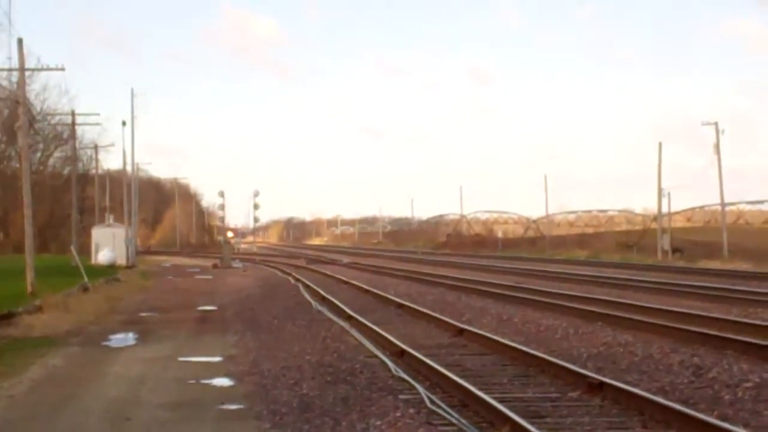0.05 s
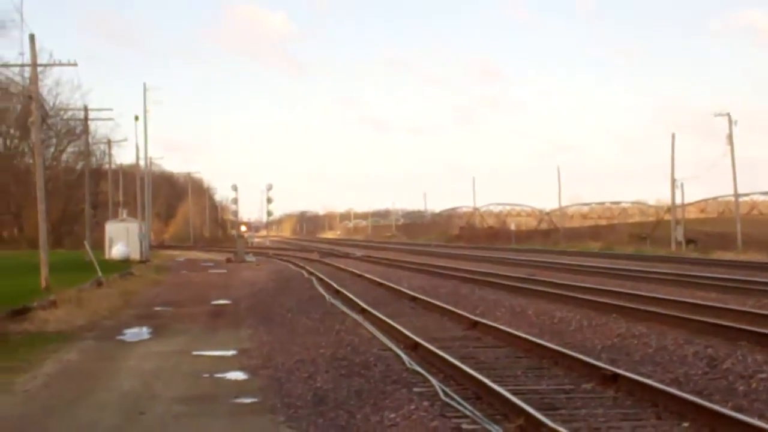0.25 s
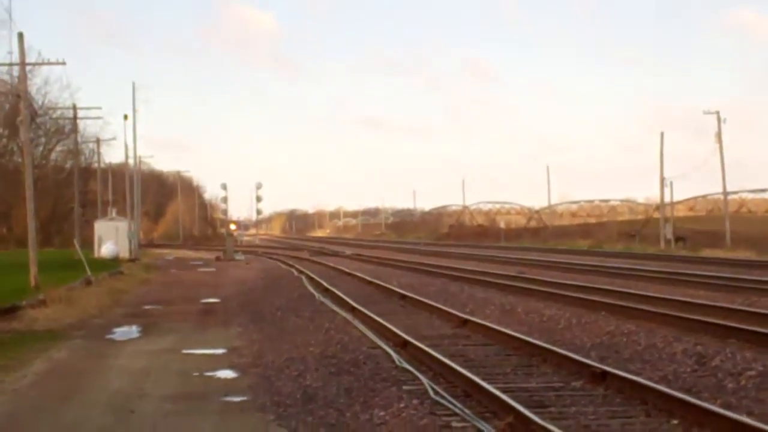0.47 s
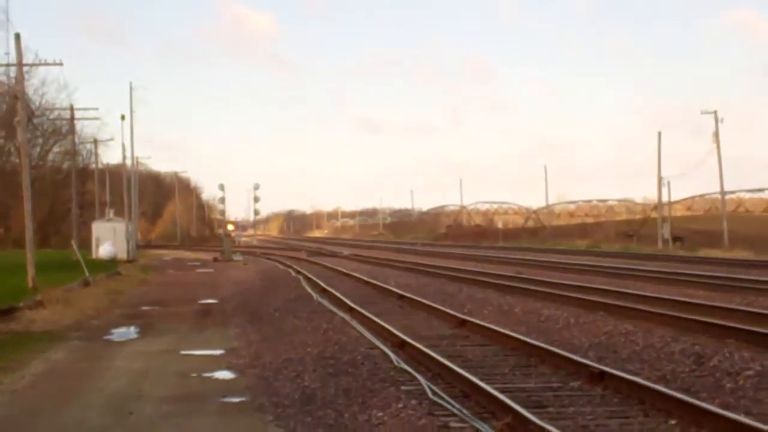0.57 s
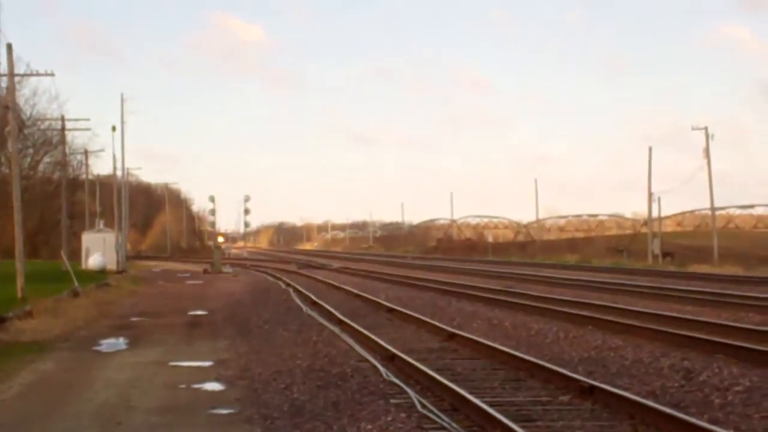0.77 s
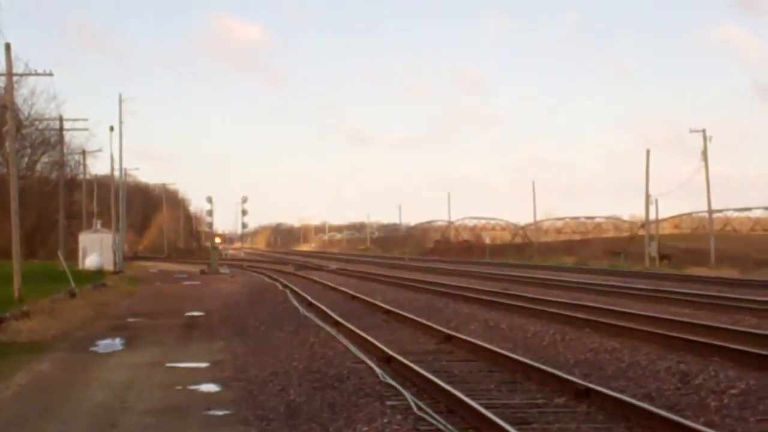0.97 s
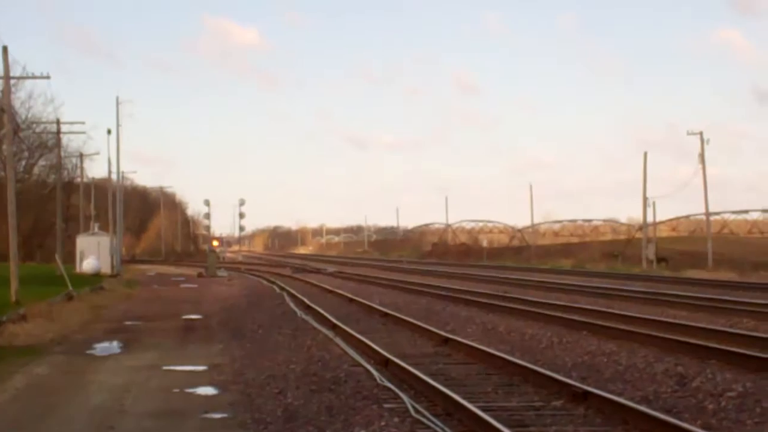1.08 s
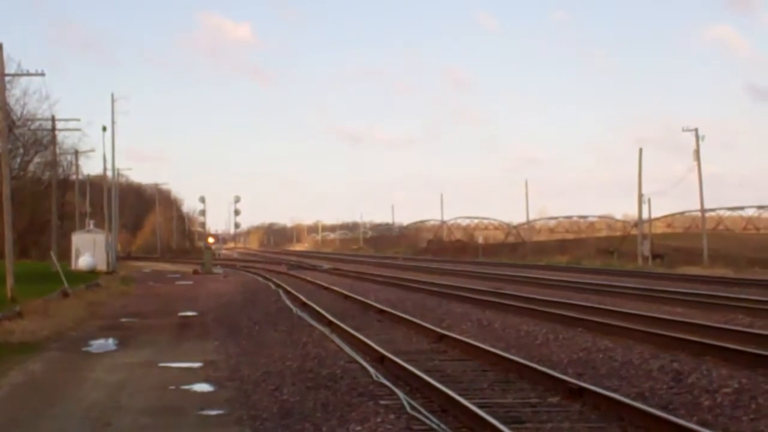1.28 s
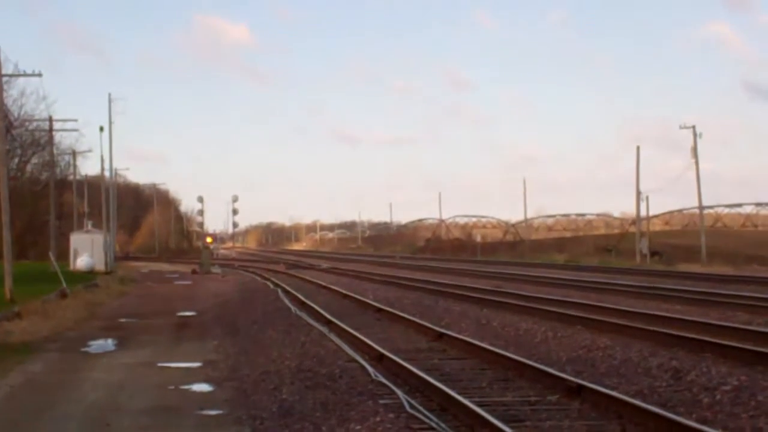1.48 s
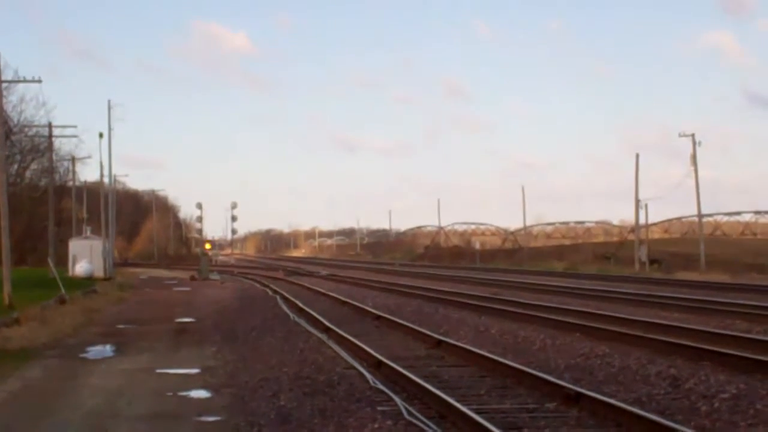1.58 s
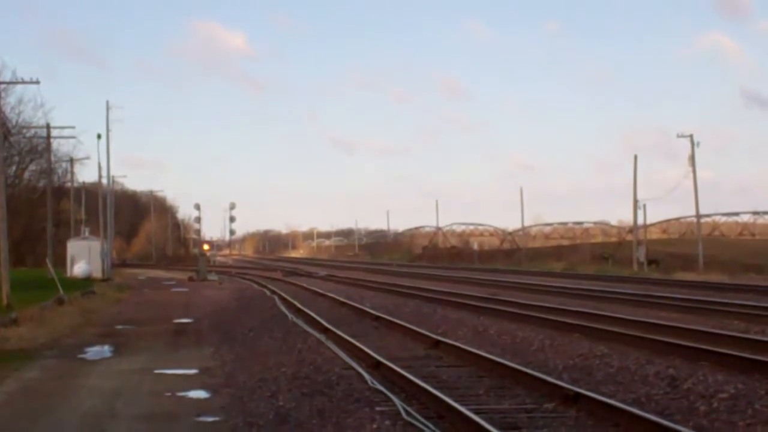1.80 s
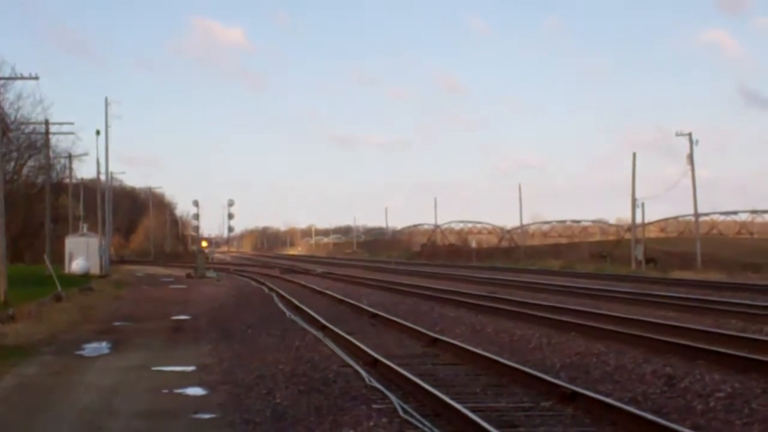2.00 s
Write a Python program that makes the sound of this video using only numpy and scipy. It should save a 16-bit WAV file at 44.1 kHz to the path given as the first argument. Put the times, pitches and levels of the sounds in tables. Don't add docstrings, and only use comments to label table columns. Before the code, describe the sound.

Wind buffets a small stereo microphone in the open throughout, about two seconds. Low rumble and uneven thumps come at once, with a bump near 0.4 s, then build to the hardest, slightly overloaded thud with a sharp spit at 0.76 s. It eases around 0.9-1.0 s, then heavy gusts return at 1.2 and 1.4 s, with a tiny click at 1.42 s. Fluttering thumps continue from 1.7 s as the very faint distant air rush rises slightly.

```python
import sys
import numpy as np
from scipy import signal
from scipy.fft import rfft, irfft
from scipy.io import wavfile
from scipy.ndimage import uniform_filter1d

SR = 44100
rng = np.random.default_rng(int(sys.argv[2]) if len(sys.argv) > 2 else 0)


def gain_from_db(level_db):
    decades = np.asarray(level_db, float) / 20
    return 10 ** decades


def int16_out(signal):
    q = np.round(np.clip(np.atleast_2d(signal).T, -1, 1) * 32767)
    wavfile.write(sys.argv[1], SR, q.astype(np.int16))


N = 90360

BASS_SAME = 0.25


def evened(x):
    return x / np.sqrt(np.mean(x ** 2, -1, keepdims=True) + 1e-20)


def read(points, hz):
    f, value = np.transpose(points)
    return np.interp(np.log(hz + 1), np.log(f + 1), value)


def noise(colour, same, lag_s=0, patchy_db=0):
    frames, hz = N // 256 + 5, np.fft.rfftfreq(1024, 1 / SR)
    a, b, c, d, patches = rng.standard_normal((frames, 513, 5)).T
    patches = uniform_filter1d(patches, size=12, axis=0)
    patches = uniform_filter1d(patches, size=10, axis=1)
    same = np.clip(same(hz), 0, 1)[:, None]
    delay = np.exp(-2j * np.pi * hz * lag_s)[:, None]
    left = a + 1j * b
    right = same * left * delay + np.sqrt(1 - same ** 2) * (c + 1j * d)
    level_db = read(colour, hz)[:, None] + patchy_db * patches / patches.std()
    z = np.array([left, right]) * gain_from_db(level_db)
    return evened(signal.istft(z, nperseg=1024, noverlap=768)[1][:, :N])


def bass_shared(hz):
    return BASS_SAME * np.exp(-hz / 150)


def unshared(hz):
    return 0 * hz


def steadied(x, size):
    steady = 0.72
    power = uniform_filter1d(uniform_filter1d(x ** 2, size=size), size=size // 2)
    return evened(x / (power + .1) ** (steady / 2))


def bumps(times, lengths, dbs):
    fall = 0.69
    t = np.arange(N) / SR
    power = 0
    for s, length, db in zip(times, lengths, dbs):
        width = np.where(t > s, fall * length, length)
        power = power + gain_from_db(2 * db) * np.exp(-((t - s) / width) ** 2)
    return np.sqrt(power)


def gain_db():
    # (time [s], gain [dB])
    gain = [(0, -60), (.25, -57.5), (.5, -55.5), (.59, -55), (0.746, -51), (.78, -60), (.9, -62.5),
            (1.0, -59), (1.15, -54.5), (1.3, -55), (1.41, -52.5), (1.45, -55), (1.53, -56.5), (1.7, -51.5),
            (1.8, -50.5), (2.05, -48)]
    return np.interp(np.arange(N) / SR, *np.transpose(gain))


def roar():
    # (frequency [Hz], density [dB per Hz])
    rush_colour = [(300, -7), (800, -1), (2000, -3), (3300, -6), (5000, -15), (7500, -22), (11000, -32.5),
                   (12600, -47)]
    # (frequency [Hz], coherence [0-1])
    likeness = [(300, 0.77), (900, 0.99), (2500, 0.71), (4500, 0.27), (7000, 0.77), (10000, .1)]
    # (frequency [Hz], level [dB])
    left_bright = [(3000, -0.5), (5000, 0), (8000, 2.5)]
    lag_s, level_db, pan_db = 4 / 44100, 5, 0.5
    rush = noise(rush_colour, lambda hz: read(likeness, hz), lag_s, patchy_db=0.36)
    tilt_db = read(left_bright, np.fft.rfftfreq(N, 1 / SR)) * np.array([[.5], [-.5]])
    rush = irfft(rfft(rush) * gain_from_db(tilt_db), N)
    return rush * gain_from_db(gain_db() + level_db + pan_db * np.array([[1], [-1]]))


def flow():
    # (frequency [Hz], density [dB per Hz])
    flow_colour = [(15, 4), (30, -1), (60, -2.5), (150, -9.5), (350, -14.5), (700, -26.5), (1500, -42),
                   (5000, -85)]
    mean_db, follows_gain, lump_db, lump_hz = -36, 0.44, 2, 44
    lowpass = 1 + (np.fft.rfftfreq(N, 1 / SR) / lump_hz) ** 2
    lumps = evened(irfft(rfft(rng.standard_normal((2, N))) / lowpass, N))
    gain = gain_db()
    level_db = mean_db + follows_gain * (gain - gain.mean()) + lump_db * lumps
    return steadied(noise(flow_colour, bass_shared, patchy_db=1.5), size=1500) * gain_from_db(level_db)


def eddies():
    # (time [s], length [s], thump level [dB], rasp level below thump [dB])
    left_eddies = [(0.025, 0.04, -35, -8.5), (0.1, 0.0076, -35, -14), (0.25, 0.033, -39.5, -6),
                   (0.322, 0.011, -35, -13.5), (0.058, 0.019, -30, -13), (0.074, 0.026, -32.5, -26),
                   (0.164, 0.019, -33, -17), (0.272, 0.023, -30, -17), (0.37, 0.0095, -34.5, -12),
                   (0.388, 0.092, -37.5, -15.5), (0.476, 0.02, -33, -16), (0.618, 0.012, -28.5, -14),
                   (0.646, 0.039, -32, -13), (0.673, 0.013, -29, -27), (0.697, 0.01, -26.5, -21),
                   (0.728, 0.025, -25.5, -20), (0.763, 0.019, -25.5, -7), (1.096, 0.018, -39.5, -6),
                   (1.124, 0.029, -30.5, -10), (1.161, 0.016, -28, -8.5), (1.196, 0.021, -27.5, -11),
                   (1.311, 0.03, -33.5, -7.5), (1.39, 0.013, -24, -11), (1.428, 0.016, -29, -10),
                   (1.672, 0.0072, -32.5, -9), (1.703, 0.024, -29.5, -32), (1.751, 0.016, -33.5, -15),
                   (1.779, 0.021, -30.5, -12.5), (1.891, 0.062, -32.5, -16), (1.91, 0.0082, -31.5, -2.5),
                   (1.962, 0.018, -34.5, -24), (1.979, 0.038, -35.5, -20), (2.002, 0.019, -39, -18),
                   (2.027, 0.01, -21.5, -13.5)]
    right_eddies = [(0.018, 0.057, -30.5, -27), (0.048, 0.03, -33, -11), (0.424, 0.016, -26.5, -14),
                    (0.486, 0.017, -33.5, -27), (0.615, 0.011, -35.5, -8.5), (0.653, 0.038, -32.5, -9),
                    (0.683, 0.01, -29.5, -25), (0.7, 0.0052, -24, -32), (0.761, 0.015, -27.5, -39),
                    (0.871, 0.017, -28.5, -18), (1.075, 0.027, -29, -15.5), (1.11, 0.0071, -29, -17),
                    (1.174, 0.0078, -27.5, -13), (1.2, 0.018, -24.5, -13), (1.26, 0.025, -38.5, -8.5),
                    (1.297, 0.015, -31.5, -15), (1.324, 0.0088, -34.5, -10), (1.343, 0.012, -34.5, -7.5),
                    (1.402, 0.023, -23, -19), (1.635, 0.048, -39.5, 1.5), (1.653, 0.013, -33, -13),
                    (1.684, 0.021, -39.5, -3.5), (1.744, 0.037, -31.5, -7), (1.782, 0.01, -31, -12),
                    (1.816, 0.046, -35.5, -3.5), (1.835, 0.012, -30.5, -13), (1.889, 0.015, -34, -17),
                    (1.928, 0.073, -34, -21), (1.974, 0.008, -36.5, -23), (2.016, 0.013, -24, -14)]
    # (frequency [Hz], density [dB per Hz])
    thump_colour = [(50, -30), (90, 4.5), (130, 1), (250, -6), (400, -15.5), (700, -33), (3000, -100)]
    rasp_colour = [(250, -40), (430, -3.5), (650, -10), (1100, -18.5), (2000, -30.5), (6000, -77)]
    thump_spread, rasp_spread = 0.7, 0.51
    thump = steadied(noise(thump_colour, bass_shared), size=500)
    rasp = steadied(noise(rasp_colour, unshared), size=250)
    out = np.zeros((2, N))
    for port, table in enumerate((left_eddies, right_eddies)):
        s, length, db, rasp_db = np.transpose(table)
        out[port] = thump[port] * bumps(s, thump_spread * length, db)
        out[port] += rasp[port] * bumps(s, rasp_spread * length, db + rasp_db)
    return out


def pushes():
    # (time [s], length [s], left level [dB], right level [dB])
    heaves = [(0.029, 0.083, -32.5, -31), (0.104, 0.019, -44, -51), (0.164, 0.039, -30.5, -46),
              (0.432, 0.013, -23, -25.5), (0.482, 0.047, -26.5, -44), (0.495, 0.037, -36, -48),
              (0.639, 0.016, -22, -36), (0.711, 0.021, -40, -25), (0.756, 0.015, -32, -15),
              (0.879, 0.03, -32, -26), (0.997, 0.033, -40, -48), (1.069, 0.03, -29, -44),
              (1.132, 0.053, -29, -35), (1.198, 0.038, -25, -26), (1.308, 0.013, -32, -42),
              (1.356, 0.019, -42, -33), (1.41, 0.032, -24.5, -28.5), (1.446, 0.014, -36, -26),
              (1.565, 0.028, -38, -53), (1.635, 0.028, -31, -39), (1.702, 0.028, -32, -29),
              (1.74, 0.018, -32, -26.5), (1.787, 0.011, -25, -30), (1.847, 0.013, -44, -41),
              (1.934, 0.012, -27, -43), (1.998, 0.048, -26, -40)]
    # (frequency [Hz], density [dB per Hz])
    heave_colour = [(12, 2.5), (28, 4), (70, -6.5), (95, -6.5), (150, -49), (600, -100)]
    spread, coherence = 0.39, 0.66
    s, length, *dbs = np.transpose(heaves)
    heave = steadied(noise(heave_colour, lambda hz: coherence + 0 * hz), size=1200)
    return heave * np.array([bumps(s, spread * length, db) for db in dbs])


def flutters():
    # (time [s], pitch [Hz], length [s], peak level [dB])
    left_vortices = [(.059, 620, 0.0059, -28.5), (.161, 605, 0.0042, -32.5), (.164, 895, 0.0042, -36),
                     (.263, 800, 0.0045, -41), (.272, 234, 0.0071, -27.5), (.344, 694, 0.0033, -34),
                     (.421, 830, 0.013, -45), (.426, 400, 0.0029, -23), (.525, 90, .025, -33),
                     (.634, 430, 0.0044, -27.5), (.73, 550, .004, -30.5), (.763, 950, 0.0052, -27),
                     (.7635, 283, 0.0078, -21), (.765, 2273, 0.0065, -31), (.828, 523, 0.0069, -36),
                     (.93, 167, 0.021, -35.5), (.8, 403, .015, -36.5), (1.049, 497, 0.0056, -31),
                     (1.073, 600, .01, -36), (1.163, 1160, 0.0045, -39), (1.196, 150, 0.014, -17.5),
                     (1.203, 617, .009, -31.5), (1.287, 720, 0.0055, -40), (1.388, 570, 0.006, -29),
                     (1.413, 1000, 0.0077, -37), (1.456, 417, 0.0029, -29), (1.501, 560, .008, -33.5),
                     (1.596, 540, 0.0045, -33), (1.618, 610, .005, -37), (1.651, 580, .004, -34),
                     (1.697, 700, .007, -36), (1.781, 85, 0.027, -24), (1.874, 690, 0.0059, -30)]
    right_vortices = [(.075, 65, 0.038, -30.5), (.143, 223, 0.012, -30), (.2, 650, 0.005, -44),
                      (.422, 218, .006, -22.5), (.488, 171, 0.01, -30.5), (.644, 294, .009, -28.5),
                      (.658, 710, .008, -43), (.731, 710, 0.0066, -35.5), (.755, 1420, 0.0023, -30.5),
                      (0.7634, 273, 0.014, -17), (.93, 170, 0.023, -35), (1.115, 580, 0.0042, -41),
                      (1.205, 240, .011, -20), (1.255, 252, 0.015, -32), (1.698, 70, .035, -27),
                      (1.691, 714, .004, -41), (1.713, 497, 0.0035, -30), (1.741, 780, 0.0066, -43),
                      (1.777, 220, 0.014, -28), (1.781, 85, 0.029, -25), (1.94, 60, .035, -29),
                      (2.034, 670, .005, -38)]
    spread, sag = .33, .1
    reach = 2000
    t = np.arange(-reach, reach) / SR
    out = np.zeros((2, N))
    for port, table in enumerate((left_vortices, right_vortices)):
        starts = rng.uniform(-0.12, .1, len(table))
        for (s, hz, length, db), start in zip(table, starts):
            turns = start + hz * (t - sag * t ** 2 / (2 * length))
            bell = np.exp(-.5 * (t / (spread * length)) ** 2)
            flutter = gain_from_db(db) * bell * np.cos(2 * np.pi * turns)
            at = round(s * SR) - reach
            part = out[port, at:at + len(t)]
            part += flutter[:len(part)]
    return out


def spits():
    spit_at = [.059, .163, .346, .731, .766, .797, 1.163, 1.205, 1.389, 1.875]
    # (length [s], level [dB])
    spit_sizes = [
        (.004, -53),
        (0.006, -57),
        (0.0032, -47),
        (.004, -57),
        (0.0062, -25.5),
        (0.012, -43),
        (0.0031, -44),
        (0.0089, -41),
        (0.0041, -56),
        (0.0039, -38),
    ]
    # (frequency [Hz], density [dB per Hz])
    spit_colour = [(300, 2.5), (800, 3), (2300, -1.5), (4000, -16), (7000, -35), (14000, -76)]
    length, db = np.transpose(spit_sizes)
    crackle = steadied(noise(spit_colour, unshared), size=100)
    return crackle * bumps(spit_at, .5 * length, db) * gain_from_db([[0], [-25]])


def splice():
    at_s, tail_s, port_db = 1.42331, .0012, (-33.5, -26.5)
    t = np.arange(N) / SR - at_s
    band_limit = signal.firwin(255, 16350, window=("kaiser", 7), fs=SR)
    jump = np.convolve(np.sign(t) * np.exp(-abs(t) / tail_s), band_limit, "same")
    return jump * gain_from_db(np.array(port_db))[:, None]


def scene():
    return roar() + flow() + eddies() + pushes() + flutters() + spits()


def roll_off(x):
    return signal.sosfilt(signal.butter(12, 17400, fs=SR, output="sos"), x)


def record(dry):
    ceiling, air_top_hz = .4, 12450
    top = signal.firwin(401, air_top_hz, window=("kaiser", 10), fs=SR)[None]
    air = signal.oaconvolve(ceiling * np.tanh(dry / ceiling), top, "same")
    return roll_off(air + splice())


dry = scene()
out = record(dry)
int16_out(out)
```